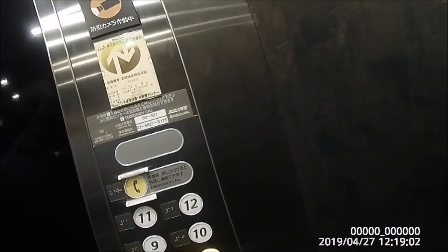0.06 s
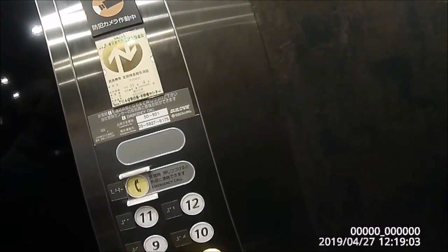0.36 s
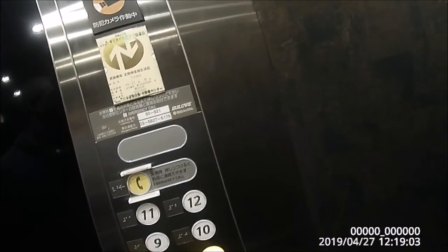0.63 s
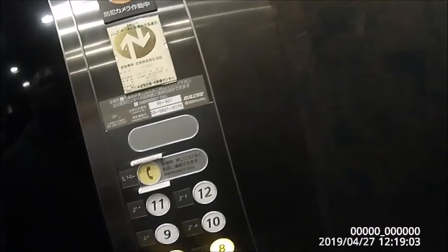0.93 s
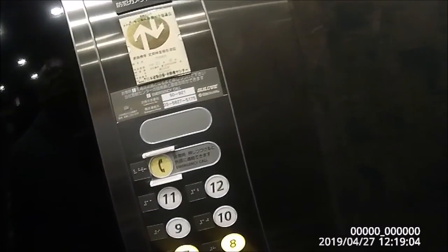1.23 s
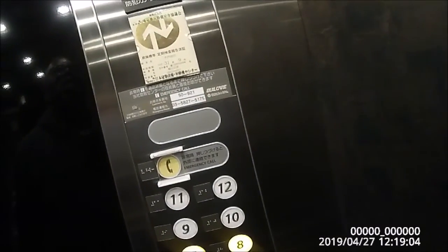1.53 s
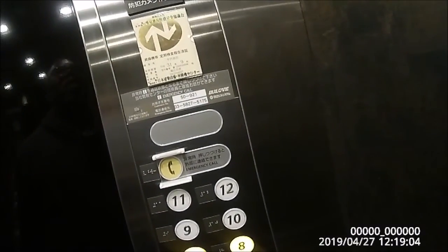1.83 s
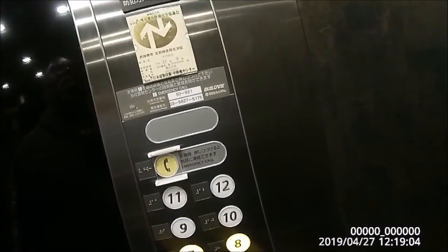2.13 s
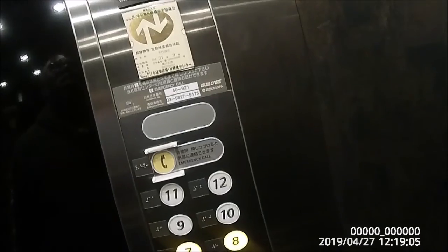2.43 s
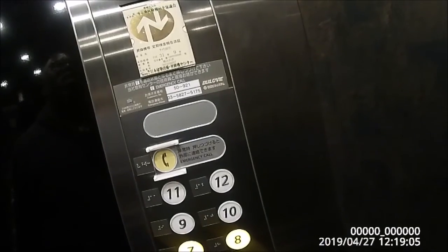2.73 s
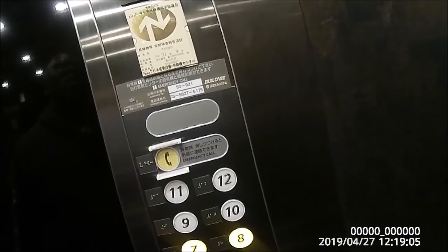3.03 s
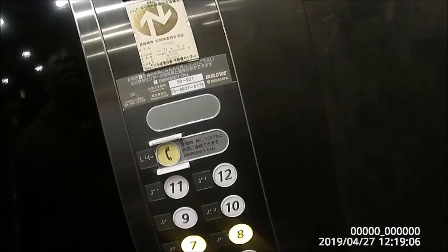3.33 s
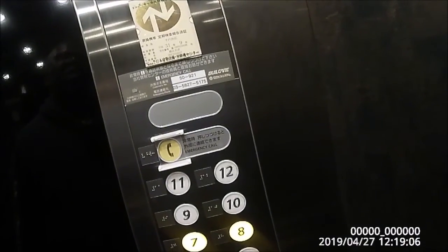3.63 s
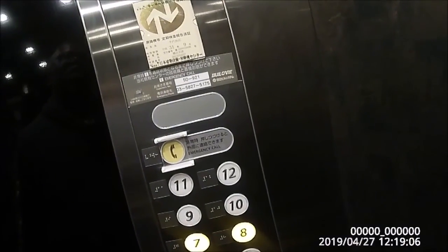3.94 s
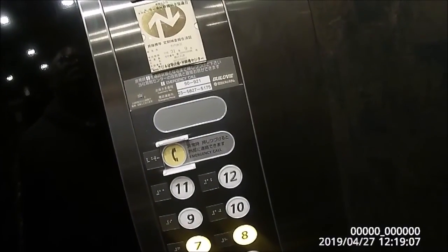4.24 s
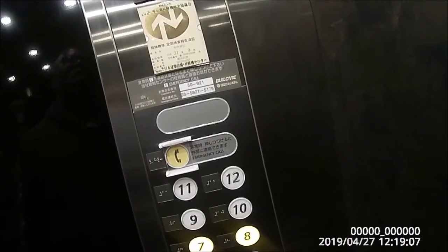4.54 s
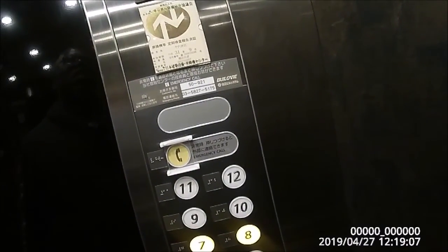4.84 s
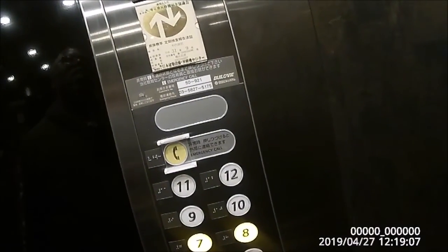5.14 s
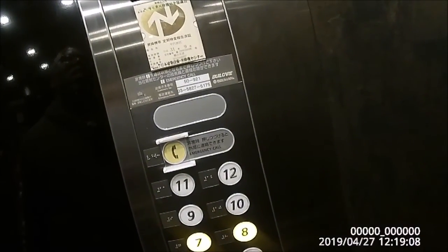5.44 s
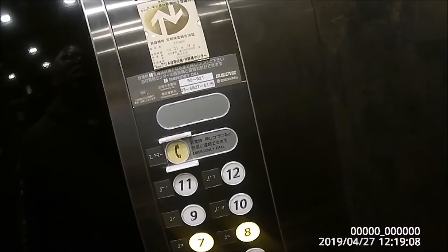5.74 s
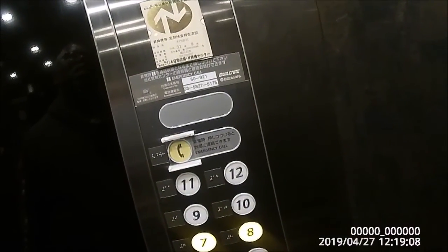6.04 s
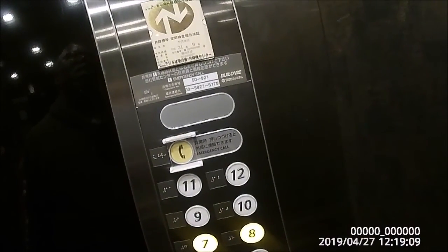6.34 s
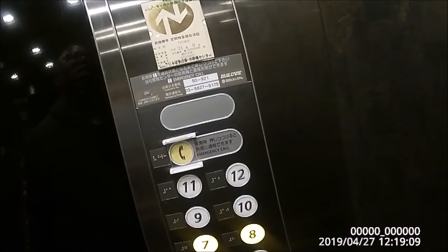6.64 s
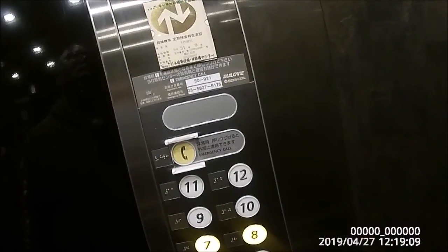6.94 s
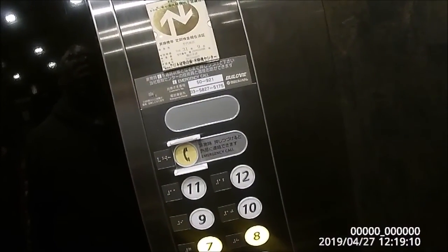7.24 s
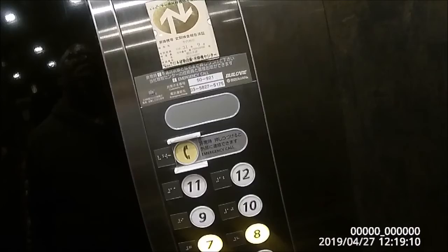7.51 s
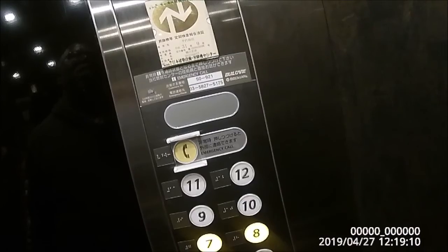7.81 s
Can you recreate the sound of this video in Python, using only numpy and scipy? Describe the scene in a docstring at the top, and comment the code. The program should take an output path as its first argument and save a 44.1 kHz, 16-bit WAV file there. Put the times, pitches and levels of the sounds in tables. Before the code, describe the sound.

For about eight seconds, an elevator car is heard from inside as it travels. A deep rumble and the drone of guide rollers run throughout, together with a low electric hum from the motor and fan that beats and briefly sags now and then. Two soft low swells lead to a stronger floor boom at about 1 second. Gentle jolts thicken the rumble around 2, 4, 5 and 6.8 seconds. Behind this are a soft rush of shaft air, a steady high ringing hiss and a barely audible thin whine. The running gear sings faintly in wavering tones, holding one note from about 4 seconds on. A small part ticks lightly near 0.9 seconds, most clearly at 1.4, and again around 3.1, 3.6 and 6.7, each with a brief steel cabin echo. The ride continues steadily to the end.

```python
"""Inside a moving elevator

The car rumbles and jolts on its guide rails, its floor booms near the start, and the rollers drone
through the walls. Mains, motor and fan hum; the running gear sings and the drive whines faintly.
Air rushes along the shaft, and now and then a small part ticks. Behind it all a steady hiss rings
near 2.8 kHz, with fainter peaks above."""
import sys
import numpy as np
from scipy import signal
from scipy.fft import rfft, irfft, next_fast_len
from scipy.io import wavfile
from scipy.ndimage import uniform_filter1d

SR = 44100
rng = np.random.default_rng(int(sys.argv[2]) if len(sys.argv) > 2 else 0)


def transcribe(u):
    """Save the signal u as a 16-bit wav file named by the first command-line argument.

    u: samples, shape (n,) or (channels, n), limited to [-1, 1]; the rate is SR.
    q: integer samples, one column per channel.
    """
    v = np.clip(np.atleast_2d(u).T, -1, 1)
    q = np.round(v * 32767).astype(np.int16)
    wavfile.write(sys.argv[1], SR, q)


N = 347067
T = np.arange(N) / SR
FFT_SIZE = next_fast_len(N, real=True)
FREQS = np.maximum(np.fft.rfftfreq(FFT_SIZE, 1 / SR), 1)

# Roughness of the ride, for car body and rollers: time_s, sway_db, low_roll_db, upper_roll_db
RIDE = [(0, -34, -49, -53.5), (.9, -33, -50, -54.5), (1.4, -40.5, -50.5, -53), (2.1, -39.5, -49, -58),
        (3.6, -39.5, -49, -57), (4.2, -34, -49, -57.5), (5.3, -33.5, -48.5, -56.5),
        (6.9, -32.5, -45, -55.5), (7.87, -35.5, -46.5, -55)]


def undb(db):
    """Decibels to gain."""
    return 10 ** (np.asarray(db) / 20)


def unit(x):
    """Scale to rms 1."""
    return x / np.sqrt(np.mean(x ** 2))


def curves(table):
    """Each column of a timed table, joined by straight lines."""
    times, *columns = np.transpose(table)
    return [np.interp(T, times, column) for column in columns]


def bump(peak_s, rise_s, fall_s):
    """A smooth swell that reaches 1 at peak_s."""
    return np.exp(-((T - peak_s) / np.where(T < peak_s, rise_s, fall_s)) ** 2)


def colour(points):
    """An EQ curve through (freq_hz, gain_db) points, falling away above the last."""
    hz, db = np.transpose(points)
    return undb(np.interp(np.log(FREQS), np.log(hz), db)) * np.minimum(hz[-1] / FREQS, 1) ** 2


def resonance(hz, width_hz):
    """Gain of a steep resonance: two like poles in a row."""
    return 1 / (1 + ((FREQS ** 2 - hz ** 2) / (FREQS * width_hz)) ** 2)


def noise(gain):
    """Noise of rms 1, shaped by a gain at every frequency."""
    spectrum = gain * (rng.standard_normal(len(gain)) + 1j * rng.standard_normal(len(gain)))
    return unit(irfft(spectrum, FFT_SIZE)[:N])


def drift(rate_hz):
    """A slow random wobble of rms 1, moving at up to about rate_hz."""
    return noise(1 / (1 + (FREQS / rate_hz) ** 4))


def steady(x, firmness):
    """Level out the swells of a vibration: firmness 0 leaves them, 1 flattens them."""
    swell = uniform_filter1d(np.abs(signal.hilbert(x, FFT_SIZE)[:N]), SR // 8)
    return unit(x / swell ** firmness)


def tone(hz, wander_rad):
    """A sine of rms 1 with a wandering phase."""
    return np.sqrt(2) * np.sin(2 * np.pi * (hz * T + rng.random()) + wander_rad * drift(2.7))


def ringing_hiss():
    """A steady hiss rings near 2.8 kHz, probably in the microphone port, with fainter peaks above."""
    # Resonances in the hiss: centre_hz, width_hz, level_db
    peaks = [(2767, 530, -59.5), (3917, 210, -76), (5230, 150, -79.5), (6730, 550, -81)]
    return sum(noise(resonance(hz, width)) * undb(db + 0.22 * drift(14)) for hz, width, db in peaks)


def drive_whine():
    """The motor drive's switching makes a thin, steady whine."""
    # Comb of switching sidebands: pitch_hz, level_db
    sidebands = [(7732, -99), (7792, -97), (7852, -86), (7912, -86), (7972, -96), (8032, -101)]
    return sum(undb(db) * tone(hz, wander_rad=0.1) for hz, db in sidebands)


def running_gear(fade_s=0.2):
    """The running gear sings faintly: wavering tones that fade in, hold and fade out."""
    # Spells of singing: start_s, end_s, pitch_hz, level_db, wander_rad
    spells = [(0.6, 1.3, 375, -66, 2.3), (1.3, 2.95, 375, -69, 2.6), (4.55, 5, 375, -70, 2.9),
              (0, 2.6, 534, -74, .8), (3, 4, 534, -68.8, .5), (3.9, 8.1, 534, -66.5, .6),
              (3.5, 4.5, 1268, -76, 8.7), (7.5, 7.87, 1268, -74.5, 9)]
    out = np.zeros(N)
    for start_s, end_s, hz, db, wander_rad in spells:
        inside_s = np.minimum(T - start_s, end_s - T)
        fade = np.sqrt(np.clip(0.5 + inside_s / fade_s, 0, 1))
        out += fade * undb(db + drift(4.7)) * tone(hz, wander_rad)
    return out


def shaft_air(rush_lift_db=6.0):
    """Air rushes past the car over a low rustle."""
    # Draught in the shaft: time_s, rush_db (before the lift), rustle_db
    draught = [(0, -66, -69.5), (1.2, -65.5, -61.5), (3.5, -65.5, -83), (7.87, -65, -71)]
    # Colour of the rushing air: freq_hz, gain_db
    rush_eq = [(150, -1), (350, 4.5), (490, 6.5), (590, 9.5), (700, 2.5), (860, 0.5), (1200, -2.5),
               (1430, -2), (1600, -6), (2200, -8.5), (4500, -12.5), (8300, -16.5), (10000, -20),
               (15000, -21.5)]
    rush_db, rustle_db = curves(draught)
    rush = noise(colour(rush_eq)) * undb(rush_db + rush_lift_db + 0.62 * drift(7.5))
    rustle = noise(resonance(hz=343, width_hz=170)) * undb(rustle_db)
    return rush + rustle


def ticks(width_hz=4300, trim_db=-7.5, echo_db=-19, echo_decay_s=0.054):
    """Each tick is a short crackle that rings a small part, with the brief echo of the steel cabin."""
    # Small ticks: start_s, level_db (before the trim), decay_s, brightest_hz
    hits = [(.879, -56, .008, 5500), (1.36, -49, .001, 4800), (1.362, -41, 0.0022, 4700),
            (1.381, -59, 0.012, 5050), (1.525, -63, .03, 6000), (3.078, -58, .008, 4800),
            (3.103, -53.5, 0.014, 4750), (3.619, -57, .009, 5700), (6.632, -54.5, 0.017, 5500),
            (6.829, -60, .014, 6300)]
    out = np.zeros(N)
    for start_s, db, decay_s, hz in hits:
        age = np.maximum(T - start_s, 0)
        echo = undb(echo_db) * np.exp(-age / echo_decay_s)
        envelope = (T >= start_s) * (np.exp(-age / decay_s) + echo)
        crackle = envelope * rng.choice([-1, 1], N)
        ring_eq = unit(resonance(hz, width_hz) ** 2)
        out += undb(db + trim_db) * irfft(rfft(crackle, FFT_SIZE) * ring_eq, FFT_SIZE)[:N]
    return out


def rollers(crossover_hz=215, low_lift_db=1.5, flutter_db=1.5):
    """Guide rollers drone through the walls and ring the cabin; their low notes swell and flutter."""
    # Colour of the rollers through the walls: freq_hz, gain_db
    roller_eq = [(45, -15), (68, -0.5), (85, -3.5), (125, -3), (160, 1.5), (198, -2.5), (210, -9.5),
                 (270, -10.5), (310, -18.5), (450, -29), (900, -54)]
    # Standing waves of the cabin: pitch_hz, width_hz, level_db
    cabin_modes = [(140.7, 2.3, -58.5), (157.9, 13.4, -60), (259.2, 12, -67.5), (283.4, 8.3, -68.5),
                   (600, 16, -74.5)]
    _, low_db, upper_db = curves(RIDE)
    drone_eq = colour(roller_eq)
    low_share = 1 / (1 + (FREQS / crossover_hz) ** 8)
    low = steady(noise(drone_eq * np.sqrt(low_share)), firmness=1.0)
    low *= undb(low_db + low_lift_db + flutter_db * drift(6))
    upper = noise(drone_eq * np.sqrt(1 - low_share)) * undb(upper_db)
    ring = sum(noise(resonance(hz, width)) * undb(db) for hz, width, db in cabin_modes)
    return low + upper + ring


def machine_hum(mains_hz=100, motor_hz=119.9, fan_hz=80, motor_db=-43.5, fan_db=-49.5):
    """Mains hum beats against motor and fan; now and then the motor sags, and the mains less so."""
    # Mains hum, a little fuller at the start and late in the ride: time_s, level_db
    mains_levels = [(0, -37), (3, -39.4), (5.3, -38), (7.87, -38.5)]
    # Sags in the hum: centre_s, half_length_s, mains_dip_db, motor_dip_db
    sags = [(1.03, 0.21, -2, -10.5), (2.17, 0.27, 0, -12.5), (3.87, 0.38, -0.5, -7),
            (5.73, 0.11, -4.5, -20), (6.42, .2, -0.5, -19), (7.213, 0.19, -3.5, -6)]
    mains_db = curves(mains_levels)[0]
    for centre_s, half_s, mains_dip_db, motor_dip_db in sags:
        sag = bump(centre_s, half_s, half_s)
        mains_db += mains_dip_db * sag
        motor_db += motor_dip_db * sag
    mains = undb(mains_db) * tone(mains_hz, wander_rad=0.11)
    motor = undb(motor_db) * tone(motor_hz, wander_rad=0.63)
    fan = undb(fan_db + 1.6 * drift(8.8)) * tone(fan_hz, wander_rad=0.5)
    return mains + motor + fan


def car_body(boom_hz=47.35, throb_db=1.5, jolt_half_s=0.075):
    """The car shudders on its rails, harder at each jolt; for a moment one floor mode takes over."""
    # Colour of the body's low shudder: freq_hz, gain_db
    shudder_eq = [(5, -17), (12, -6), (17, -5), (21, 1), (28, 0), (35, -8), (46, -14), (54, -22), (66, -34),
                  (110, -50)]
    # Jolts from uneven spots in the rails: time_s, boost_db
    jolts = [(1.83, 6.5), (2.09, 6), (3.84, 7), (4.04, 6), (4.93, 7.5), (5.26, 5), (5.83, 3.5), (6.74, 6.5),
             (6.9, 5.5)]
    # Floor booms, two soft and one hard: peak_s, level_db
    booms = [(.3, -39), (.6, -42), (1.0, -30)]
    boom_gain = sum(undb(db) * bump(s, rise_s=0.13, fall_s=0.16) for s, db in booms)
    jolt_db = sum(db * bump(s, jolt_half_s, jolt_half_s) for s, db in jolts)
    sway_db = curves(RIDE)[0]
    sway = undb(sway_db + throb_db * drift(8.3) + jolt_db)
    duck = sway / np.sqrt(sway ** 2 + 2 * boom_gain ** 2)  # the shudder gives way to each boom
    shudder = sway * duck * steady(noise(colour(shudder_eq)), firmness=0.78)
    return shudder + boom_gain * tone(boom_hz, wander_rad=0.2)


def scene():
    """Every layer reaches both channels alike."""
    mix = car_body() + rollers() + machine_hum()
    mix += running_gear() + drive_whine() + shaft_air() + ringing_hiss() + ticks()
    return np.array([mix, mix])


def record(dry, hiss_db=-61.0, left_trim_db=-0.13, top_hz=15000):
    """The left channel sits a hair lower, each adds its own electronic hiss, and the top is cut steeply."""
    # Electronic hiss, with flicker noise in the bass: freq_hz, gain_db
    hiss_eq = [(20, 34), (70, 35.5), (140, -3), (350, 2.5), (650, -24), (1400, -5.5), (2800, -15),
               (3600, -3), (4500, 5), (12000, 2.5), (15000, -1)]
    hiss = np.array([noise(colour(hiss_eq)) for _ in dry])
    heard = dry * undb([[left_trim_db], [0]]) + undb(hiss_db) * hiss
    high_cut = signal.ellip(10, 0.1, 80, top_hz, fs=SR, output="sos")
    return signal.sosfilt(high_cut, heard)


dry = scene()
out = record(dry)
transcribe(out)
```